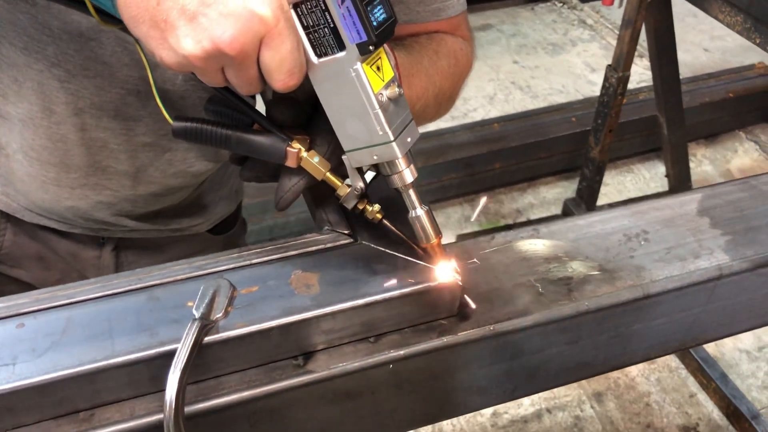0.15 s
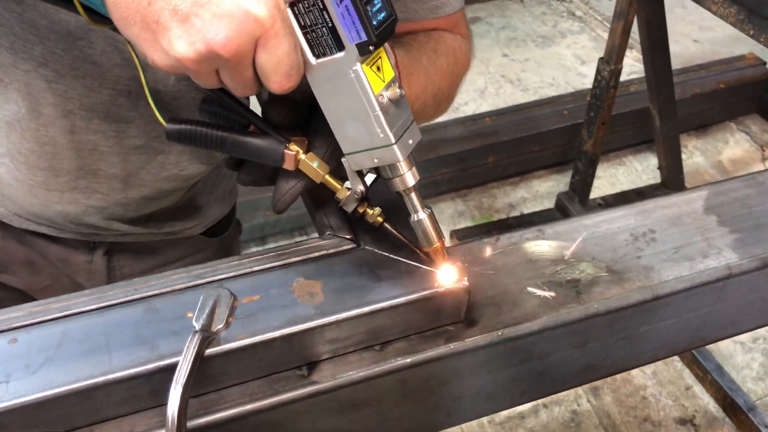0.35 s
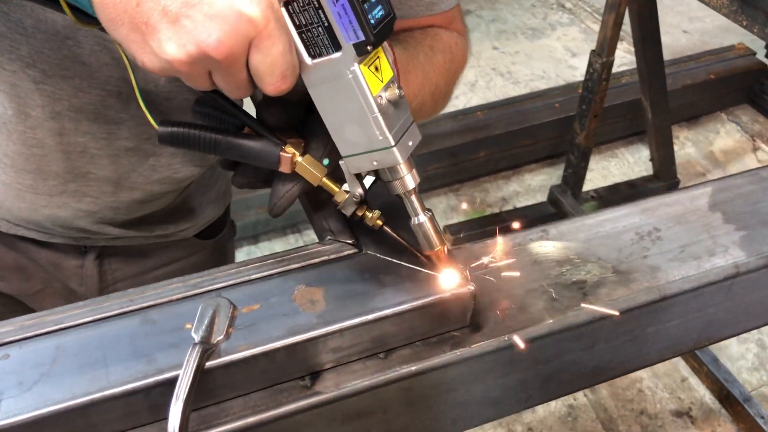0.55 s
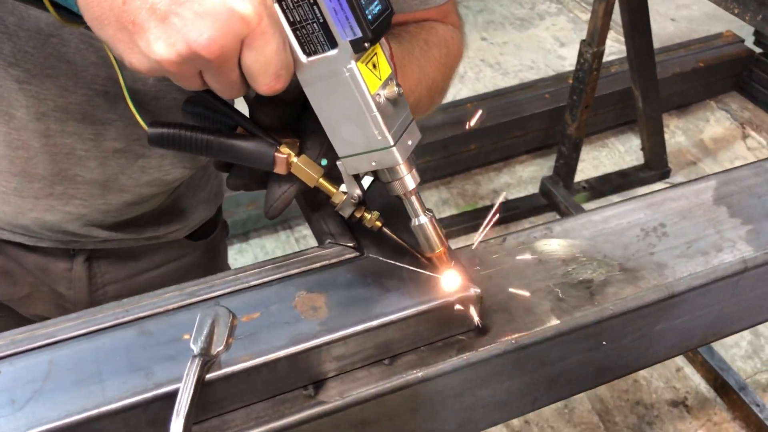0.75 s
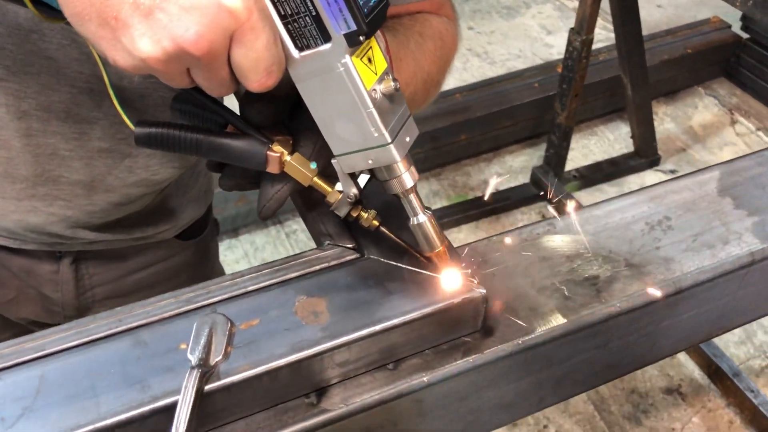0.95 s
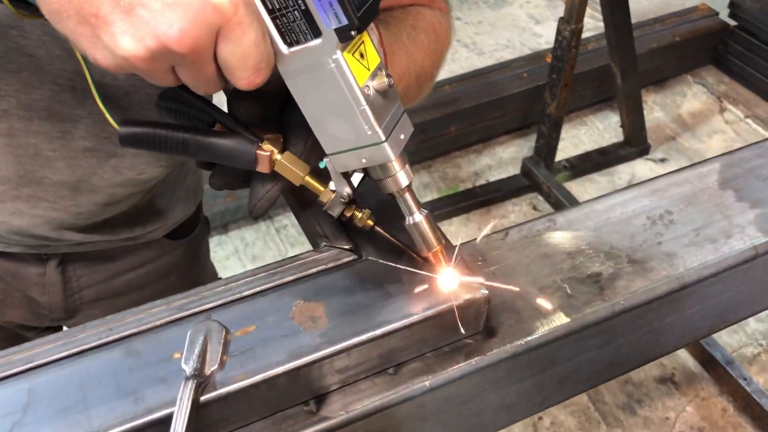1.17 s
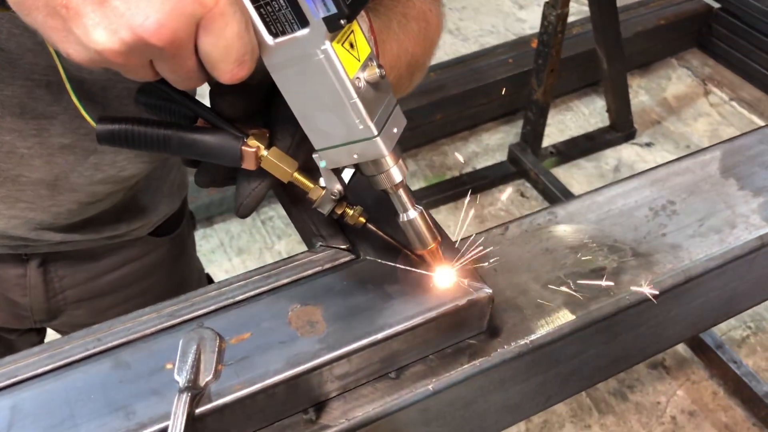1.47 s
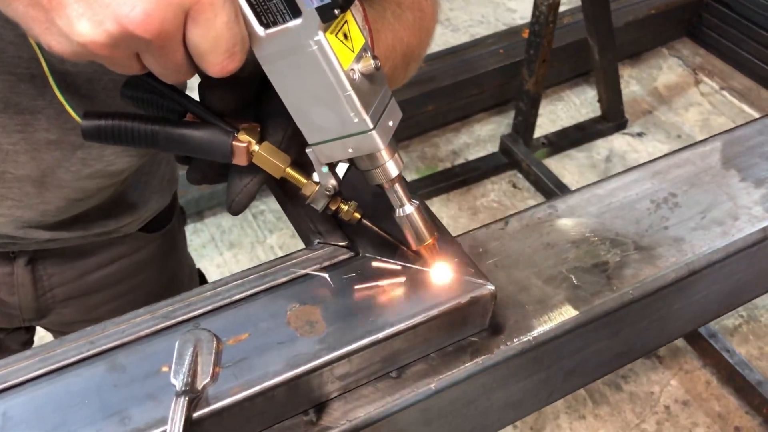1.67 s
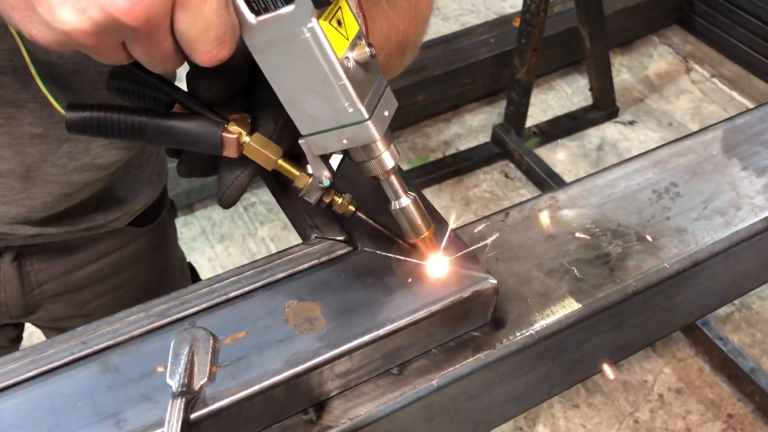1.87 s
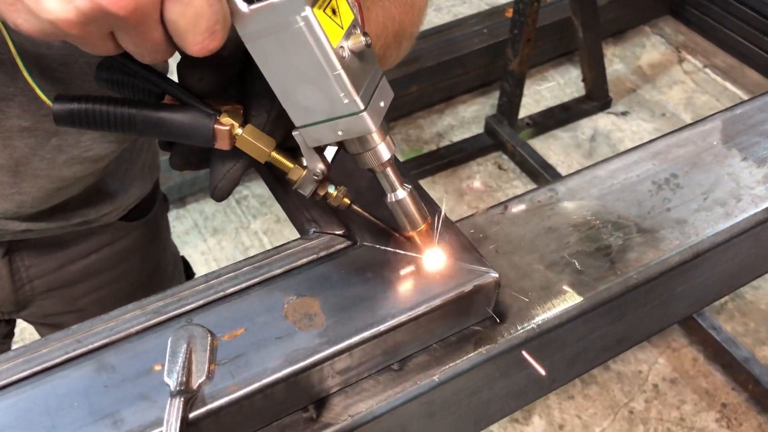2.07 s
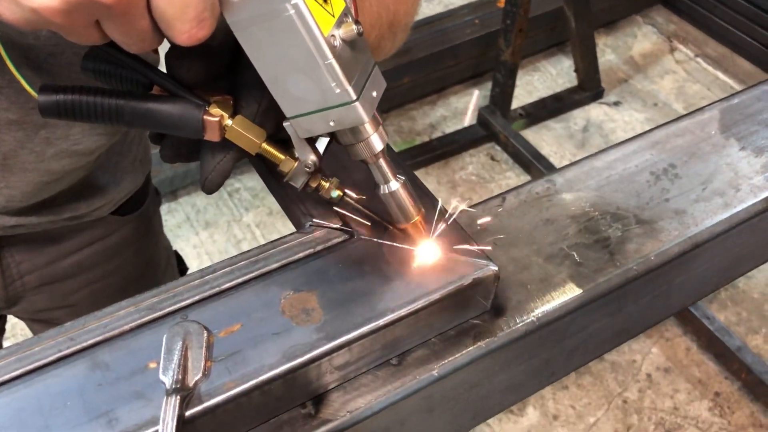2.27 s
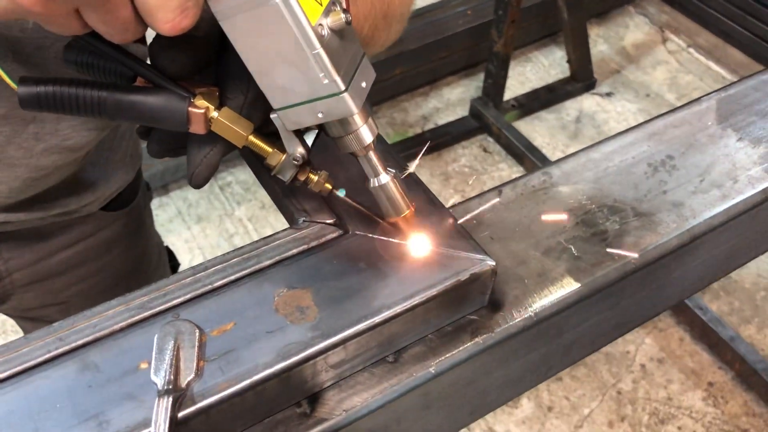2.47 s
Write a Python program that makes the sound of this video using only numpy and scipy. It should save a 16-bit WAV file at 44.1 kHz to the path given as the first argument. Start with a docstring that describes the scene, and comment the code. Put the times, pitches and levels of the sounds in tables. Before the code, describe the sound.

Already running at the start, a sharp sizzling weld hiss stays nearly constant to the end, its tone shifting slightly as the torch moves, over very soft gas flow and low hum, heard close in a workshop.

```python
"""A handheld laser welder is already running along a seam in steel tube, close to the microphone.
From the start, noise coloured by resonances hisses from the melt pool, fluttering twice a beam sweep and
crackling with short noise bursts of spatter; soft noise rushes in the nozzle and faint sines hum behind.
As the torch moves, resonances swell and fade and two hollows shift, the upper one gliding up throughout.
At about 1.4 s the gas rush swells briefly; the nozzle's hollow ring gains slowly to the end."""
import sys
import numpy as np
from scipy import signal
from scipy.fft import rfft, irfft, next_fast_len
from scipy.io import wavfile
from scipy.ndimage import uniform_filter1d, map_coordinates

SR = 44100
rng = np.random.default_rng(int(sys.argv[2]) if len(sys.argv) > 2 else 0)


def pcm_store(signal):
    """Save signal as 16-bit PCM."""
    levels = np.round(np.clip(np.atleast_2d(signal), -1, 1) * 32767)
    wavfile.write(sys.argv[1], SR, levels.astype(np.int16).T)


N = 115542

TOP_HZ = 15780  # nothing is heard above this


def amp(db):
    """Decibels to gain."""
    return 10 ** (np.asarray(db) / 20)


def unit(x):
    """x at rms 1."""
    return x / np.sqrt(np.mean(x ** 2) + 1e-20)


def along(points, hz):
    """(frequency, value) points read on a log frequency axis."""
    f, v = np.transpose(points)
    return np.interp(np.log(hz + 1), np.log(f + 1), v)


def curves(rows, t):
    """Each column after the time, read at times t."""
    times, *columns = np.transpose(rows)
    return [np.interp(t, times, column) for column in columns]


def wobble(rate):
    """A smooth random curve through normal random knots, rate knots a second."""
    knots = rng.standard_normal(int(N * rate / SR) + 4)
    return map_coordinates(knots, [np.arange(N) * rate / SR])


def filtered(x, response):
    """x times a response of frequency, padded so that tails do not wrap round."""
    m = next_fast_len(N + 8192)
    return irfft(rfft(x, m) * response(np.fft.rfftfreq(m, 1 / SR)), m)[:N]


def bell(hz, centre, width):
    """A smooth Gaussian bump of height 1."""
    return np.exp(-.5 * ((hz - centre) / width) ** 2)


def spatter():
    """Tiny decaying noise bursts of boiling metal: many weak ones, a few strong."""
    bursts_per_s, spread_db, decay_s = 700, 2.5, 0.00045
    sizes = amp(spread_db * np.minimum(rng.exponential(size=N), 5))
    bursts = (rng.random(N) < bursts_per_s / SR) * sizes
    decay = np.exp(-np.arange(SR // 200) / SR / decay_s)
    return unit(np.convolve(bursts, decay)[:N] * rng.standard_normal(N))


def plume(t):
    """Vapour noise and spatter, puffing out twice in every sweep of the wobbling beam."""
    # puffs stirred up by the beam: (place in the sweep [0-1], sharpness [no unit],
    # swell of the low hiss [dB], swell of the high hiss [dB])
    puffs = [(0.236, 1.3, 5.5, 6), (0.624, 1.7, 6.8, 3.0)]
    sweep_hz, sweep_scatter = 80.47, .025  # scatter in sweeps
    split_hz, own_flicker_db = 7700, .6  # low and high hiss part here, and each flickers on its own
    spatter_db, flicker_db, surge_db = -9, 0.69, 0.18

    jet = rng.standard_normal(N) + amp(spatter_db) * spatter()
    low = filtered(jet, lambda hz: 1 / (1 + (hz / split_hz) ** 10))
    high = jet - low
    sweep = sweep_hz * t + sweep_scatter * wobble(40.4)
    low_db = high_db = 0
    for place, sharpness, low_swell, high_swell in puffs:
        puff = np.exp(sharpness * (np.cos(2 * np.pi * (sweep - place)) - 1))
        low_db = low_db + low_swell * puff
        high_db = high_db + high_swell * puff
    low_flutter = low * unit(amp(low_db + own_flicker_db * wobble(150)))
    high_flutter = high * unit(amp(high_db + own_flicker_db * wobble(150)))
    flicker = amp(flicker_db * wobble(300) + surge_db * wobble(45))
    return (low_flutter + high_flutter) * flicker


def echoed(x, t):
    """x with early echoes from torch, frame and floor, whose paths change as the torch moves."""
    # echoes: (delay at the start [s], level [dB], change of delay [s per s])
    echoes = [(.0023, -19, .00006), (.0041, -18, -.00011), (.0067, -19, .00015), (.0113, -21, .0002)]
    reflections = 0
    for delay, db, glide in echoes:
        position = (t - delay - glide * t) * SR
        reflections = reflections + amp(db) * map_coordinates(x, [position], order=5)
    return x + reflections


def weld(t):
    """The echoed plume, coloured by the slowly changing gap between torch and steel."""
    # spectrum of the melt pool's hiss: (frequency [Hz], relative level [dB])
    hiss_spectrum = [(1000, -70), (2000, -23), (2750, -22.5), (3250, -10), (5500, -5.5), (7200, -0.9),
                     (9000, -0.7), (12000, -2.6), (15700, 0.0)]
    # resonances and hollows between torch and steel: (frequency [Hz], bell width [Hz],
    # level at the start [dB], change [dB per s])
    resonances = [(2900, 140, -6.8, 5.3), (4110, 390, -1.3, 2.6), (4610, 110, -7.4, 2.0),
                  (5020, 50, 1.0, -0.0), (5960, 130, 5.7, -0.1), (6360, 240, -2.1, -0.9),
                  (7940, 330, -5.8, 4.1), (8410, 170, 3.1, -1.9), (9460, 370, 5.8, -0.3),
                  (9890, 80, -7.5, 0.3), (10490, 120, 6.1, -1.7), (11180, 190, 3.7, -0.3),
                  (11810, 150, 6.0, -2.7), (12820, 270, -1.2, 3.6), (13470, 140, -3.8, -0.1),
                  (14600, 190, 1.4, -0.6), (15540, 210, 6.8, -1.8)]
    # hollows that shift as the torch travels: (time [s], frequency [Hz], depth [dB])
    low_notch = [(0, 5090, 4.0), (0.7, 5310, 6.1), (1.35, 5370, 8.3), (1.85, 5390, 8.1), (2.6, 5360, 5.1)]
    high_notch = [(0, 11300, 2.9), (0.7, 11450, 11.6), (1.35, 11670, 13.3), (1.85, 11830, 4.9),
                  (2.6, 12230, -0.4)]
    # lower edge of the hiss: (time [s], level [dB])
    edge = [(0, 2), (.4, -0.5), (.72, -3), (1.1, 0), (1.8, -1), (2.2, 3), (2.6, 2)]
    # strength of the whole hiss: (time [s], level [dB])
    strength = [(0, -15), (.25, -16), (.5, -15), (.7, -15), (.95, -14.5), (1.18, -14.5), (1.28, -15.5),
                (1.38, -15), (1.48, -15.8), (1.6, -15.1), (1.88, -15.5), (1.99, -16.2), (2.1, -15),
                (2.45, -14.9), (2.6, -15.5)]
    edge_hz, edge_width_hz, notch_width_hz = 2350, 300, 106
    patchy_db = 0.84

    hz, frame_s, spectrum = signal.stft(echoed(plume(t), t), SR, nperseg=1024)
    hz = hz[:, None]
    edge_db, = curves(edge, frame_s)
    colour_db = along(hiss_spectrum, hz) + edge_db * bell(hz, edge_hz, edge_width_hz)
    for centre, width, db, drift in resonances:
        colour_db = colour_db + (db + drift * frame_s) * bell(hz, centre, width)
    for notch in (low_notch, high_notch):
        notch_hz, depth_db = curves(notch, frame_s)
        colour_db = colour_db - depth_db * bell(hz, notch_hz, notch_width_hz)

    # soft random patches over frequency and time
    patches = uniform_filter1d(rng.standard_normal(spectrum.shape), size=5, axis=0)
    patches = unit(uniform_filter1d(patches, size=30, axis=1))
    coloured = spectrum * amp(colour_db + patchy_db * patches) * (hz < TOP_HZ)
    hiss = signal.istft(coloured, SR, nperseg=1024)[1][:N]
    level_db, = curves(strength, t)
    return amp(level_db) * unit(hiss)


def gas(t):
    """Shaped noise for the rush of shield gas, and band-passed noise for the nozzle's hollow resonance."""
    # spectrum of gas flow and workshop air: (frequency [Hz], relative level [dB])
    rush_spectrum = [(15, -26), (40, -12), (65, -13), (90, -6.5), (250, -2), (430, -3.5), (620, 2.5),
                     (800, 3), (1150, -2.5), (1900, -4.5), (2600, -14), (4000, -15)]
    # strength of the rush: (time [s], level [dB])
    rush_level = [(0, -41), (.4, -42.3), (.9, -43), (1.3, -43), (1.41, -40.5), (1.55, -43), (2.6, -42)]
    nozzle_hz, nozzle_width_hz = 1554, 117
    nozzle_db, nozzle_db_per_s = -43.5, 0.92  # level at the start and its rise
    turbulence_db = 0.91

    def resonance(hz):
        """Band-pass response of the resonating nozzle."""
        damping = 1j * hz * nozzle_width_hz
        return damping / (nozzle_hz ** 2 - hz ** 2 + damping)

    rush = unit(filtered(rng.standard_normal(N), lambda hz: amp(along(rush_spectrum, hz))))
    nozzle = unit(filtered(rng.standard_normal(N), resonance))
    level_db, = curves(rush_level, t)
    turbulence = amp(turbulence_db * wobble(90))
    return turbulence * (amp(level_db) * rush + amp(nozzle_db + nozzle_db_per_s * t) * nozzle)


def machine(t):
    """Faint sines of the fans and pump, slightly unsteady in level and phase."""
    # tones: (frequency [Hz], rms level before the waver [dB])
    tones = [(91.5, -59), (166.9, -61), (242.2, -60), (371.4, -61), (829.0, -61.5)]
    waver_db, drift_rad = 1.0, .25
    hum = 0
    for hz, db in tones:
        level = np.sqrt(2) * amp(db + waver_db * wobble(6.02))
        phase = 2 * np.pi * (hz * t + rng.random()) + drift_rad * wobble(7.16)
        hum = hum + level * np.sin(phase)
    return hum


def scene():
    """Weld, gas and machine summed at one microphone."""
    t = np.arange(N) / SR
    return (weld(t) + gas(t) + machine(t))[None]


def record(dry):
    """Rounds off the highest peaks smoothly, then removes everything above the band limit."""
    peak_limit = .9  # full scale is 1
    rounded = dry / (1 + np.abs(dry / peak_limit) ** 10) ** (1 / 10)
    return np.array([filtered(x, lambda hz: hz < TOP_HZ) for x in rounded])


dry = scene()
out = record(dry)
pcm_store(out)
```